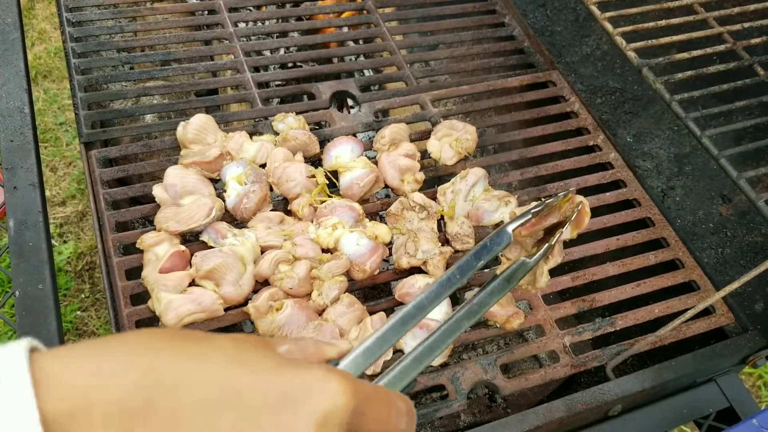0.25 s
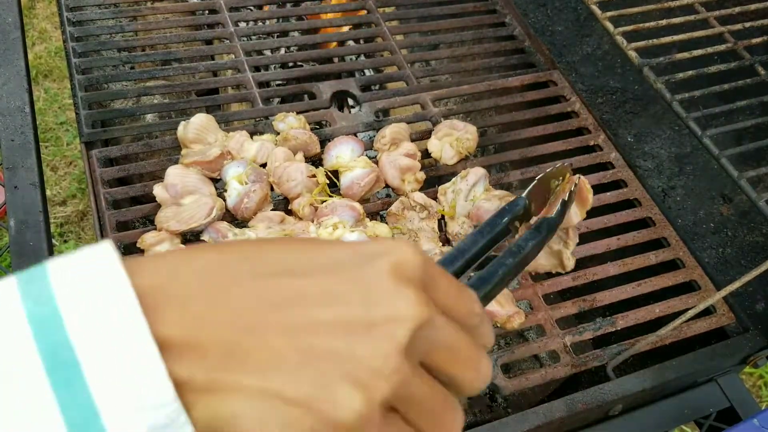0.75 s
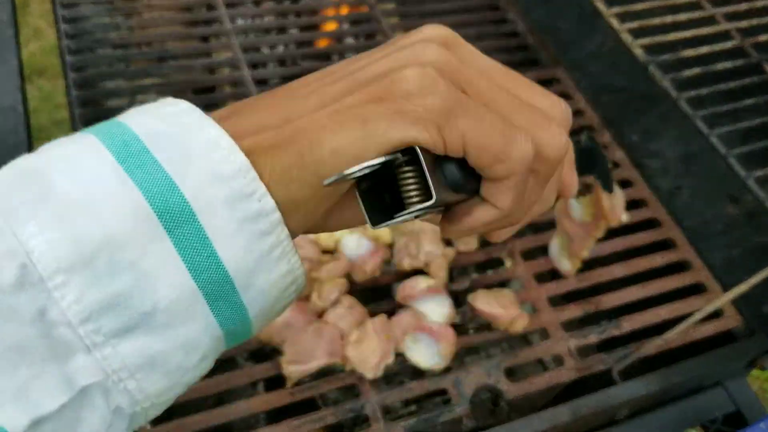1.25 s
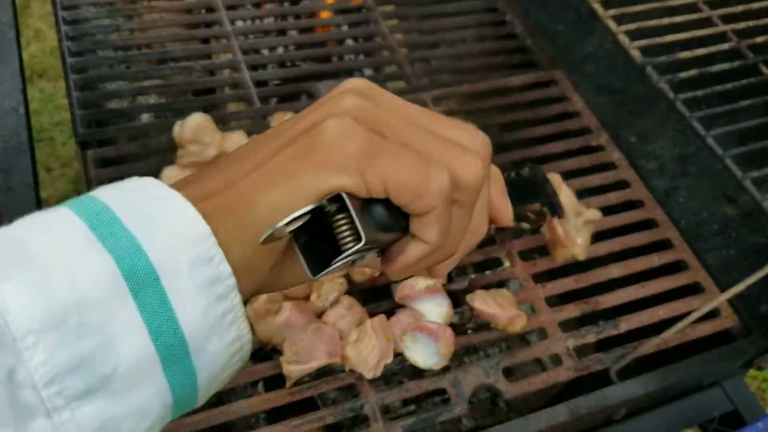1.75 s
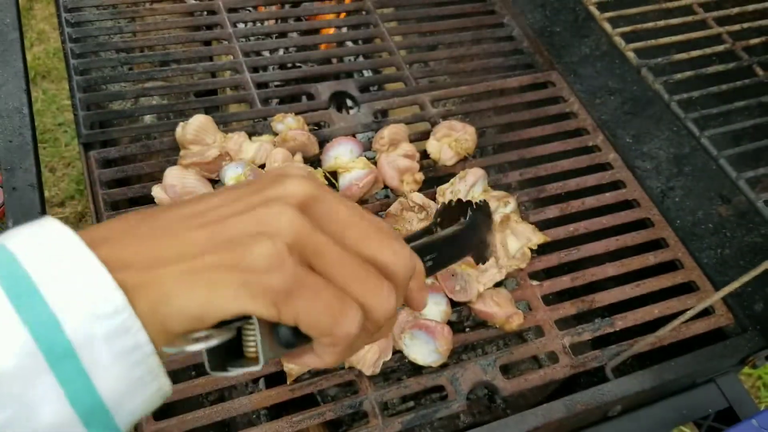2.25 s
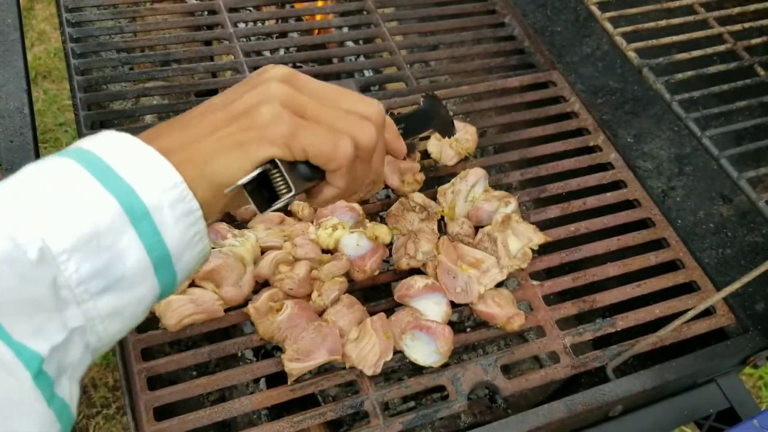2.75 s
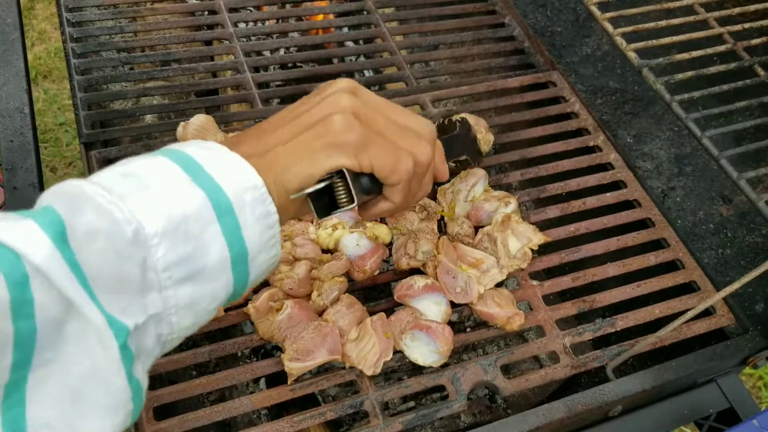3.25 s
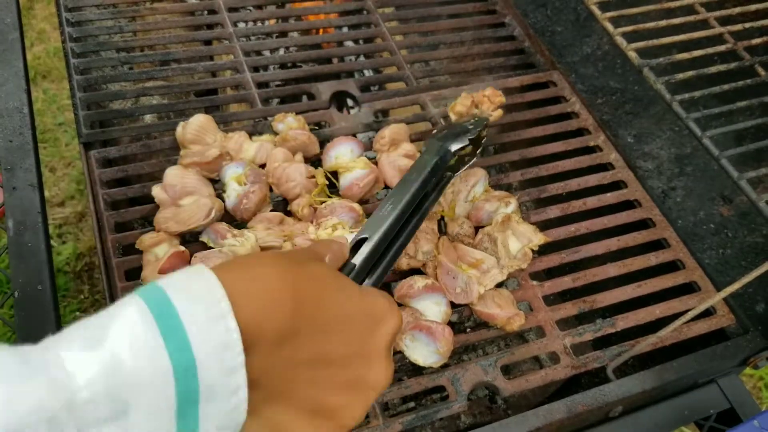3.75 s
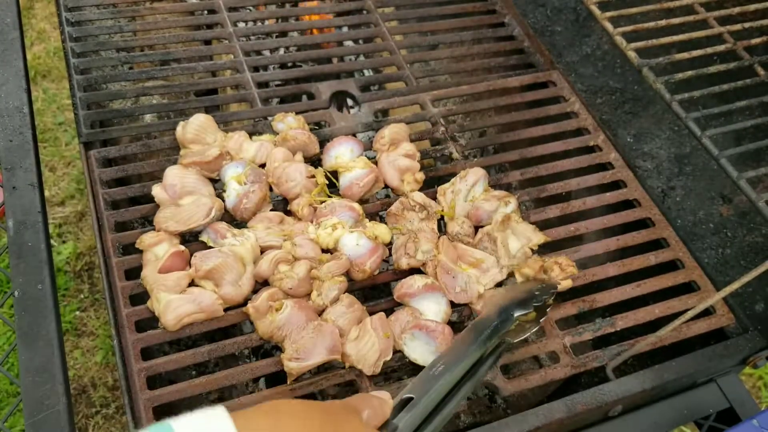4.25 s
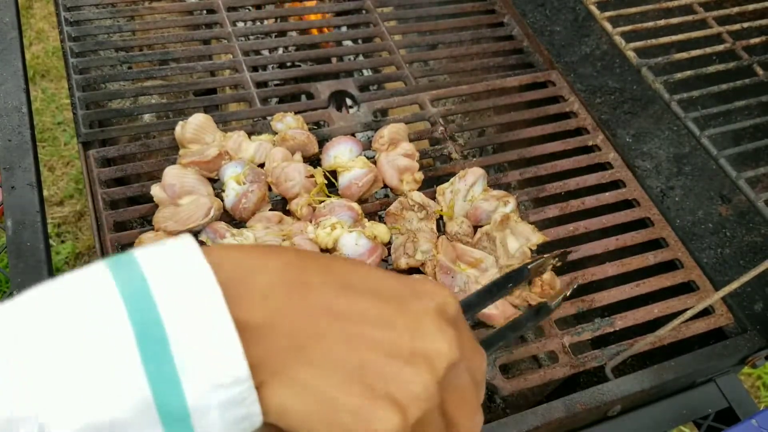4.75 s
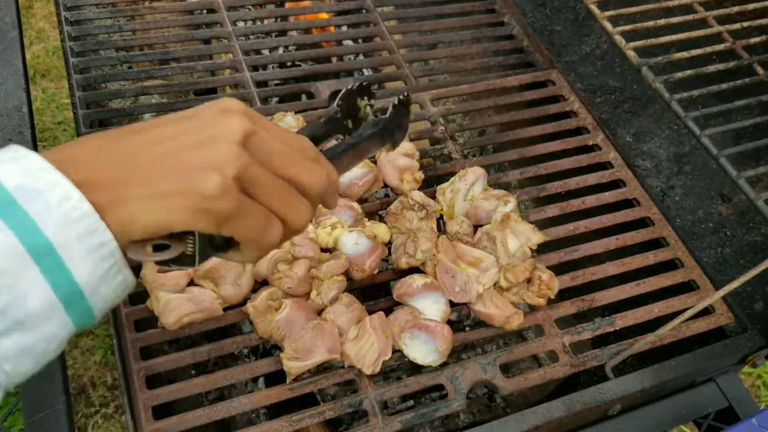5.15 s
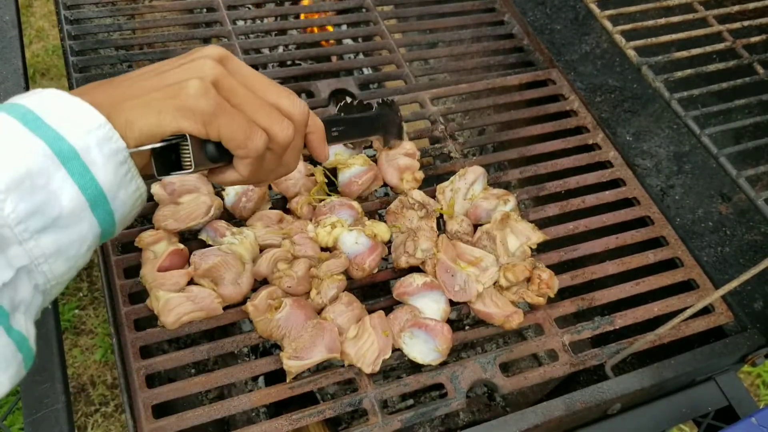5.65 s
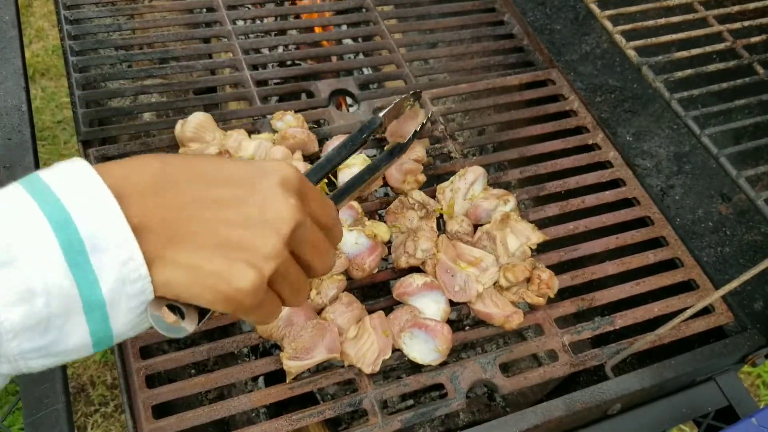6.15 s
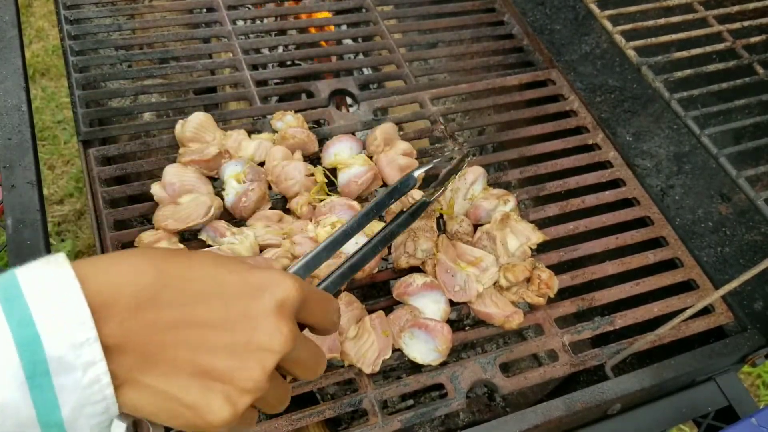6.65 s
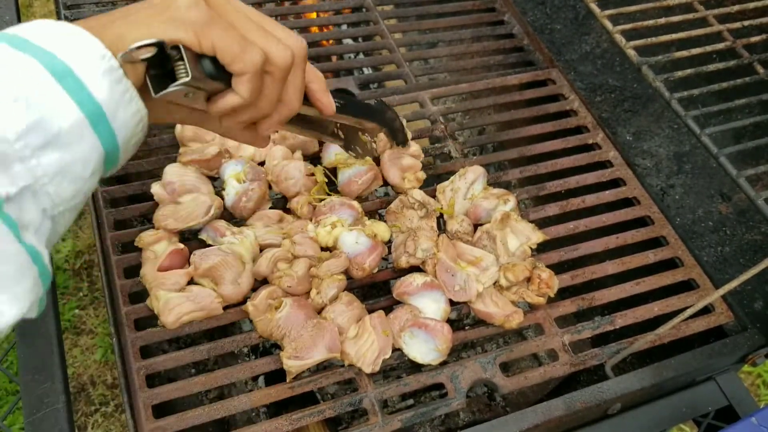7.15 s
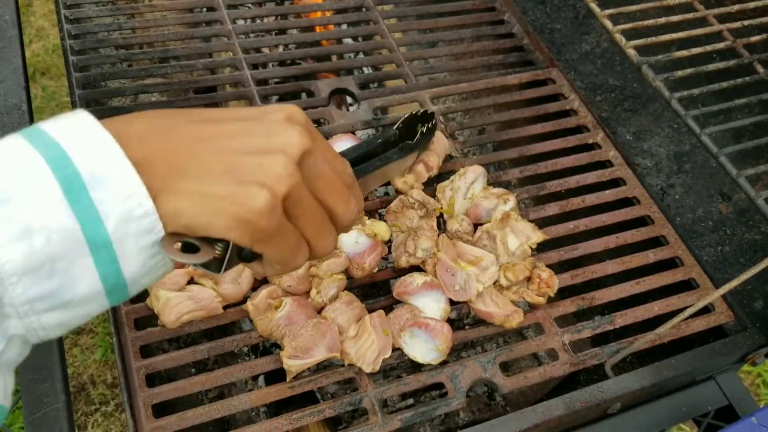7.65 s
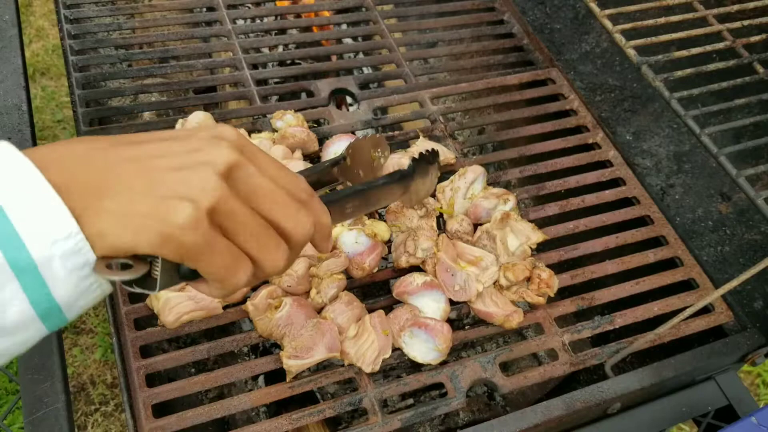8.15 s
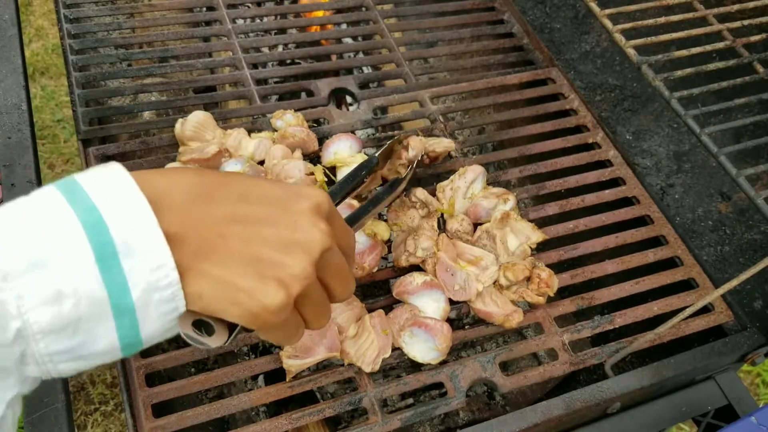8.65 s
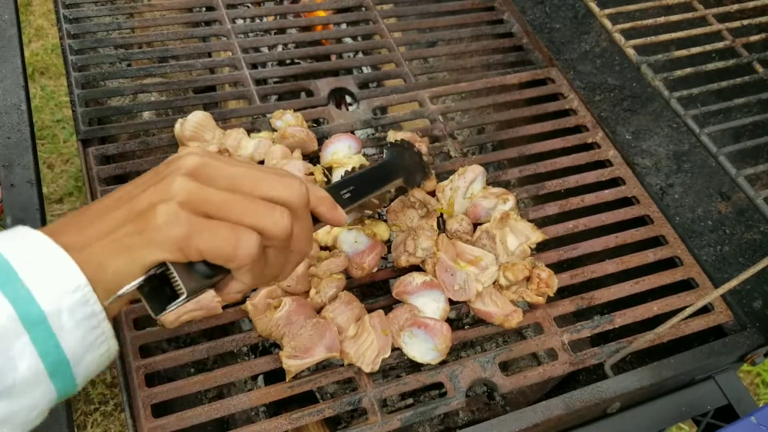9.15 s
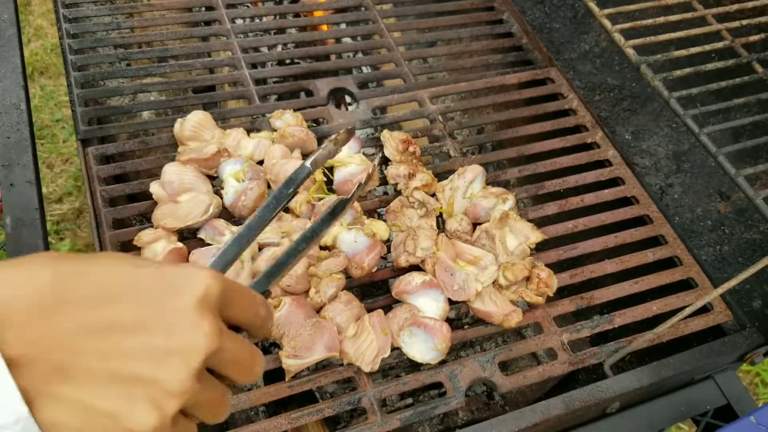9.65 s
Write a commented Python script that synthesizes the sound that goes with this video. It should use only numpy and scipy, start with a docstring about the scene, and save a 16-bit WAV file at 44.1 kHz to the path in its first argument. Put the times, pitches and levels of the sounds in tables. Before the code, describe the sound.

Steel tongs turn raw meat on a hot iron grill, with hissing flares, sleeve rustle, soft scrapes, a bright snap and a late metallic clank.

```python
"""Tongs on a hot grill

Close by, outdoors, steel tongs turn meat on an iron grate: they snap, knock, scrape and squeak.
Impacts combine filtered noise with decaying modes; friction is fluctuating noise or an unsteady tone.
Fat sizzles as noise and crackle, with flares of wet meat on hot iron; steam is resonant noise.
A sleeve rustles as clumped snags, and a low rumble, hum, wash and wind buffets are shaped noise.
"""
import sys
import numpy as np
from scipy import signal
from scipy.fft import rfft, irfft, next_fast_len
from scipy.io import wavfile

SR = 44100
rng = np.random.default_rng(int(sys.argv[2]) if len(sys.argv) > 2 else 0)


def wav_record(signal):
    """Record a signal, one row per channel, as 16-bit PCM in the file named by sys.argv[1]."""
    frames = np.transpose(np.atleast_2d(signal))
    bounded = np.clip(frames, -1, 1)
    # unit amplitude maps onto the largest positive 16-bit level
    quanta = np.round(bounded * 32767).astype(np.int16)
    wavfile.write(sys.argv[1], SR, quanta)


N = 437472

# Likeness of the two microphone ports: (frequency [Hz], correlation [-1 to 1])
PORT_CORRELATION = [(60, 0.99), (130, 0.96), (290, 0.88), (640, 0.095), (1400, 0.081), (15000, 0)]
# Balance of the ports: (frequency [Hz], left minus right [dB])
PORT_BALANCE = [(60, -1), (92, 2), (140, -1), (210, 1.5), (330, 0), (500, 2.5), (770, 0.5), (1170, 3),
                (1790, 1), (2740, 1), (4190, 3.5), (6410, 2.5), (9810, -4), (15000, 1.5)]

# Outdoor rumble and wash: (frequency [Hz], relative level [dB])
AIR_SPECTRUM = [(12, -70), (20, -13), (30, -22.5), (48, 1.5), (99, -0.5), (117, -6.5), (134, -5.5),
                (167, -10), (311, -22.5), (351, -26.5), (429, -28), (615, -33), (830, -31), (1710, -42.5),
                (2400, -53.5), (3120, -55), (5280, -120)]
# Rumble course, before its offset in outdoors(): (time [s], level [dB])
RUMBLE_LEVEL = [(0.0, -54.5), (2.98, -55.5), (3.23, -54.5), (8.09, -58.5), (8.79, -53), (9.92, -57.5)]
# Course of the faint mid-range wash, with some sleeve rustle near 1 s, before its offset in
# outdoors(): (time [s], level [dB])
WASH_LEVEL = [(0.0, -74.5), (0.6, -77.5), (0.83, -72.5), (1.13, -73), (1.57, -77.5), (2.3, -74), (2.6, -75),
              (3.06, -67.5), (3.59, -71.5), (4.35, -73.5), (4.6, -72), (6.1, -73.5), (8.3, -73.5),
              (9.4, -70.5), (9.92, -67)]
# Wind on the microphone: (time [s], length [s], level [dB])
WIND_BUFFETS = [(2.508, 0.19, -67), (4.349, 0.73, -60), (5.087, 0.35, -57), (9.103, 0.3, -56)]

# Steady sizzle: (frequency [Hz], relative level [dB])
FAT_SPECTRUM = [(1060, -59), (1800, -19.5), (2410, -14.5), (2760, -14), (3590, -12), (3860, -6), (5560, 2),
                (7850, -2.5), (8520, -2), (9240, -6.5), (12900, 1.5), (15100, -0.5), (15800, -3.5)]
# Spray from a wet side: (frequency [Hz], relative level [dB])
WET_SPECTRUM = [(1000, -10), (2200, -10), (2800, -1), (3500, -6), (5000, -3.5), (8000, 1.5), (9500, -4),
                (12500, 5), (15600, 5)]
# Flares of wet meat on hot iron; the first is already sizzling at the start:
# (time [s], level [dB], rise [s], hold [s],
# fade [dB/s], lower edge of the hiss [Hz], brightness [dB/octave])
SEAR_FLARES = [(0, -54.5, 0.0091, 0.95, 11, 3980, -2.5), (1.947, -53, 0.057, 0.39, 54, 2600, 0.5),
               (3.017, -48, 0.027, 0.33, 9, 4200, -2.5), (3.139, -50.5, 0.031, .05, 34, 2880, -3.5),
               (5.582, -52.5, 0.033, 0.2, 113, 3150, -1.5), (6.609, -43.5, 0.0044, 0.01, 112, 2920, -0.5),
               (6.665, -42.5, .015, 0.033, 28, 2560, 0.5), (7.01, -50, 0.013, 0.35, 14, 2660, -.5),
               (7.13, -55, .01, .04, 50, 2600, -3), (7.346, -48.5, 0.019, 0.071, 73, 2700, 0)]
# Steam squeezed from under a pressed piece:
# (time [s], length [s], level before the swell [dB], hiss pitch [Hz], glide [octaves])
STEAM_PUFFS = [(3.061, 0.29, -59, 8300, -0.17), (3.145, 0.22, -55, 5280, -0.33),
               (3.332, 0.11, -52.5, 4770, -.05), (3.398, 0.11, -54, 7350, .2)]

# Strokes of the sleeve along the arm:
# (time [s], level [dB], rise [s], hold [s], fade [dB/s], brightness [dB/octave])
SLEEVE_STROKES = [(0.619, -54, 0.049, 0.079, 53, -0.6), (0.939, -53.5, 0.045, 0.085, 29, -1.5),
                  (1.111, -47, 0.072, 0.13, 117, 2)]
# Rustling cloth: (frequency [Hz], relative level [dB])
CLOTH_SPECTRUM = [(100, -37), (300, -27), (800, 4.5), (1080, -5.5), (1380, 6.5), (1900, -6.5), (2170, 1.5),
                  (3300, 0), (4000, 1.5), (7500, 6.5), (12000, 7.5), (15500, 0)]

# Stick-slip of a bar or tong tip: (time [s], length [s], level [dB], pitch [Hz], glide [octaves],
# rms unsteadiness [share of the pitch])
SQUEAK_EVENTS = [(2.976, .022, -58.5, 4230, -0.043, 0.027), (3.007, .014, -61, 3950, 0, .022),
                 (4.61, .012, -56.5, 8600, 0.055, .022), (7.132, .15, -63.5, 589, -0.02, .006),
                 (8.577, 0.027, -63, 4180, -0.052, 0.023)]
# Short rubs, scrapes and dull ticks of sleeve, tongs, meat and bars: (time [s], length [s],
# level before the swell [dB], centre [Hz], spread [octaves], share of ringing power [0 to 1])
RUB_EVENTS = [(.987, 0.089, -62.5, 1000, 0.66, 0), (1.056, 0.14, -65, 700, .8, 0.4),
              (1.094, 0.014, -55, 1050, .8, 0), (1.3154, 0.0078, -50, 2140, .5, 0.04),
              (2.977, 0.14, -59.5, 750, .99, .4), (7.165, 0.22, -65, 950, 1.34, .44),
              (7.487, .025, -61, 1050, .3, 0.2), (8.522, .28, -62.5, 546, 0.96, 0.06),
              (8.961, 0.016, -60, 1700, 0.91, 0.2), (8.99, 0.013, -61, 1700, .8, 0),
              (9.132, .2, -54.5, 920, 0.98, .6), (9.297, 0.43, -61.5, 437, 0.27, .2),
              (9.827, 0.072, -58, 1340, 0.71, 0.7)]

# Modes of the grate: (frequency [Hz], level [dB], 60 dB decay time [s])
GRATE_MODES = [(287, -4, .13), (400, -7, .3), (591, 2, .21), (626, -6, .22), (675, -8, .26),
               (1026, -10, .16), (1150, -6, .18), (1190, 0, .27), (1342, -10, .14), (1420, -10, .15),
               (1965, -13, .09)]
# Modes of the fire box under the grate: (frequency [Hz], level [dB], 60 dB decay time [s])
BOX_MODES = [(283, 1, .22), (328, -1, .17), (595, -1, .14), (645, -2, .11), (832, -6, .16), (1170, -2, .15),
             (1310, -8, .22), (1558, -4, .2), (1935, -7, .12)]
# Hard blows on the grate: (time [s], level [dB], centre of the blow [Hz], spread [octaves],
# thud relative to the ringing [dB])
GRATE_KNOCKS = [(9.1215, -42.5, 640, 1.0, -7), (9.141, -47.5, 1100, .7, -4), (9.177, -55, 1190, .3, -6)]
# Low bumps: one of handling, the others of meat and tongs booming in the box: (time [s],
# level [dB], centre of the blow [Hz], spread [octaves], thud relative to the ringing [dB])
LOW_BUMPS = [(1.319, -50, 214, 0.52, 12), (2.984, -61, 750, .8, -2), (3.007, -61, 1100, 1.1, -11),
             (5.59, -56.5, 550, 2.1, -8), (5.62, -53.5, 405, 1.3, 8), (8.602, -56.5, 516, 1.5, -8),
             (9.226, -47.5, 151, 0.43, 10.5), (9.823, -47, 636, 1, -7), (9.835, -44.5, 246, 0.52, -5)]

# Modes of the tong arms: (frequency [Hz], level [dB], 60 dB decay time [s])
TONG_MODES = [(1120, -11, .055), (2606, -1, .045), (3120, 2, .055), (3225, 2, .045), (3465, 0, .06),
              (3612, -1, .04), (3980, 1, .04), (4228, 2, .05), (4604, -1, .045), (5087, -3, .04),
              (6110, 3, .04), (7111, 5, .033), (7392, 6, .033), (8070, 5, .03), (10570, 1, .033),
              (12110, 7, .028), (12960, 3, .026), (14865, 4, .03), (15400, 4, .028)]
# High modes of a struck bar with the tongs on it:
# (frequency [Hz], level [dB], 60 dB decay time [s])
BAR_MODES = [(2490, 0, .09), (2800, -4, .08), (2934, -2, .1), (3370, -2, .08), (3560, -5, .07),
             (4129, 3, .07), (7200, 2, .04), (7817, -3, .07)]
# Crack of steel on steel, also used for light touches: (frequency [Hz], relative level [dB])
STEEL_CRACK = [(200, -38), (600, -49), (1100, -18), (1500, -17), (2000, -17), (2600, -11.5), (3300, -9.5),
               (4200, -1), (5200, 7.5), (6200, 5.5), (7400, 13), (9500, 3.5), (12200, 10), (13800, 13.5),
               (15200, 8)]
# Crack of steel on iron: (frequency [Hz], relative level [dB])
IRON_CRACK = [(200, -38), (1100, -6), (1600, -11), (1900, -12), (2700, -14.5), (3400, -7), (4200, 4.5),
              (5000, -5), (5900, 1), (6800, 3.5), (8300, 4), (9500, -7.5), (13000, -2), (15200, 5)]
# Tong tips clap together and chatter: (time [s], level [dB], sliding time [s],
# brightness [dB/octave], after-ring [dB])
TIP_CLICKS = [(6.547, -20.5, 0.00057, 0.5, -9.5), (6.5522, -36, .0006, -7, -8), (6.558, -30, .0014, 2, -18),
              (6.5596, -31, .0012, -0.5, -8), (6.5612, -25.5, .0013, -1.5, -13),
              (6.5657, -34.5, .0007, -10, -5), (6.5678, -41, .001, 4, -12)]
# Tongs strike an iron bar and bounce: (time [s], level [dB], sliding time [s],
# brightness [dB/octave], after-ring [dB])
BAR_CLANKS = [(9.1203, -24.5, 0.00032, -3, -32), (9.1214, -25.5, 0.0005, 1.5, -18),
              (9.1415, -34.5, 0.0019, -2.5, -4)]
# Light touches of the tongs and spits of fat: (time [s], level [dB], sliding time [s],
# brightness [dB/octave], after-ring [dB])
LIGHT_TICKS = [(.1357, -34.5, 0.0026, 0, -30), (.433, -43, 0.0029, -0.5, -20),
               (.9424, -42.5, 0.0038, -3, -11), (2.983, -45, 0.031, -10, -2),
               (3.0491, -41.5, 0.0023, 7, -17), (6.0782, -43, 0.0023, 4, -20),
               (7.497, -44.5, 0.011, -5.5, -2), (8.2755, -46.5, .004, -2, -13), (8.588, -48, 0.0033, -8, 0),
               (8.9625, -43.5, 0.0022, -4, -18), (8.9922, -49, .002, -9, -10),
               (9.8211, -47.5, .004, -1, -3)]


def amp(db):
    """Logarithmic level: decibels become an amplitude gain."""
    return 10 ** (np.asarray(db) / 20)


def unit(x):
    """Power normalization: scales a signal to an rms of 1."""
    return x / np.sqrt(np.mean(x ** 2) + 1e-30)


def read(points, hz):
    """Linear interpolation of a spectrum on a log-frequency axis."""
    f, value = np.transpose(points)
    return np.interp(np.log(hz + 1), np.log(f + 1), value)


def curve(rows):
    """Linear interpolation of a timed level at every sample."""
    times, levels = np.transpose(rows)
    return np.interp(np.arange(N) / SR, times, levels)


def add(mix, s, sound):
    """Superposition: adds a stereo sound at time s, cut off at the end of the mix."""
    part = mix[:, round(s * SR):][:, :sound.shape[1]]
    part += sound[:, :part.shape[1]]


def colour(x, db_at):
    """Linear filtering: multiplies the spectrum by a gain in dB given as a function of Hz."""
    size = next_fast_len(x.shape[1] + 512)
    gain = amp(db_at(np.fft.rfftfreq(size, 1 / SR)))
    return irfft(rfft(x, size) * gain, size)[:, :x.shape[1]]


def octaves(hz, centre_hz):
    """Logarithmic pitch: signed distance from a centre in octaves."""
    return np.log2((hz + 1) / centre_hz)


def ports(x):
    """Spatial coherence: two unrelated signals come to share their bass but not their treble."""
    size = next_fast_len(x.shape[1])
    hz = np.fft.rfftfreq(size, 1 / SR)
    a, b = rfft(x, size)
    same = np.clip(read(PORT_CORRELATION, hz), -1, 1)
    side = amp(read(PORT_BALANCE, hz) / 2)
    left = a * side
    right = (same * a + np.sqrt(1 - same ** 2) * b) / side
    return irfft([left, right], size)[:, :x.shape[1]]


def noise(size):
    """Random excitation: white noise given the coherence and balance of the ports."""
    return ports(rng.standard_normal((2, size)))


def flutter(size, rate_hz, depth_db):
    """Random amplitude modulation: low-passed noise sets a gain with an rms depth in dB."""
    slow = colour(rng.standard_normal((1, size)), lambda hz: -20 * np.log10(1 + (hz / rate_hz) ** 4))
    return amp(depth_db * unit(slow))


def crackle(size, per_s, spread_db):
    """Random impulse train: pulses of uneven size and sign, each with its own inter-port delay."""
    sizes = amp(spread_db * np.minimum(rng.exponential(1, size), 6))
    signs = rng.choice([-1, 1], size)
    pops = sizes * signs * (rng.random(size) < per_s / SR)
    arrival = (np.arange(size) + rng.integers(-15, 16, size)) % size
    late = np.bincount(arrival, pops, size)
    return unit(ports(np.array([pops, late])))


def swell(size, rise, hold, fade_db_per_s):
    """Exponential decay: a gain rises linearly, holds, then falls at a constant rate in dB."""
    t = np.arange(size) / SR
    return np.clip(t / rise, 0, 1) * amp(-fade_db_per_s * np.maximum(t - rise - hold, 0))


def ring(modes, t, apart_hz):
    """Modal superposition: damped sines whose phases may differ more between ports when higher."""
    out = 0
    for hz, db, t60 in modes:
        apart = min(hz / apart_hz, .5) * rng.uniform(-1, 1, (2, 1))  # in cycles
        wave = np.sin(2 * np.pi * (hz * t + rng.random() + apart))
        out = out + amp(db - 60 * t / t60) * wave
    return out


def outdoors(rumble_db=1, wash_db=5, hum_db=-60, hum_hz=107):
    """Band separation: gusty low noise and a faint mid-range wash, with a narrow-band noise hum."""
    air = colour(noise(N), lambda hz: read(AIR_SPECTRUM, hz))
    low = colour(air, lambda hz: -20 * np.log10(1 + (hz / 420) ** 4))
    hum = unit(colour(noise(N), lambda hz: -20 * np.log10(1 + ((hz - hum_hz) / 6) ** 2)))
    wash = unit(air - low) * flutter(N, rate_hz=12.0, depth_db=1.5)
    rumble = unit(low) * flutter(N, rate_hz=6.4, depth_db=1.5)  # small random gusts
    rumble = rumble * amp(curve(RUMBLE_LEVEL) + rumble_db)
    wash = wash * amp(curve(WASH_LEVEL) + wash_db)
    return rumble + wash + hum * amp(hum_db)


def buffets(centre_hz=58, width_hz=24):
    """Wind pressure fluctuation: puffs of low narrow-band noise thrum on the microphone."""
    out = np.zeros((2, N))
    for s, length, db in WIND_BUFFETS:
        puff = colour(noise(round(length * SR)),
                      lambda hz: -20 * np.log10(1 + ((hz - centre_hz) / width_hz) ** 4))
        add(out, s, amp(db) * unit(puff * np.hanning(puff.shape[1])))
    return out


def sizzle(start_db=-52, drying_db_per_s=0.26):
    """Statistical bubble noise: bursts of fat merge into a hiss that dies down as pieces dry."""
    bursts = noise(N) + 0.4 * crackle(N, per_s=2500, spread_db=0.5)
    fat = unit(colour(bursts, lambda hz: read(FAT_SPECTRUM, hz)))
    fat = fat * flutter(N, rate_hz=53, depth_db=.5)
    return fat * amp(start_db - drying_db_per_s * np.arange(N) / SR)


def sears():
    """Boiling on hot iron: wet meat throws a fine spray; larger bubbles lower the edge of its hiss."""
    out, size = np.zeros((2, N)), 3 * SR
    for s, db, rise, hold, fade, edge_hz, tilt_db in SEAR_FLARES:
        def spectrum(hz):
            low_cut = -10 * np.log10(1 + (edge_hz / (hz + 1)) ** 8)
            return read(WET_SPECTRUM, hz) + tilt_db * octaves(hz, 8000) + low_cut

        bursts = noise(size) + 0.29 * crackle(size, per_s=3500, spread_db=3)
        spray = unit(colour(bursts, spectrum)) * flutter(size, rate_hz=13, depth_db=1.96)
        add(out, s, amp(db) * spray * swell(size, rise, hold, fade))
    return out


def steam(width_hz=1400):
    """Jet resonance: a sputtering hiss glides in pitch as the gap under the meat changes."""
    out, r = np.zeros((2, N)), np.exp(-np.pi * width_hz / SR)
    for s, length, db, hz, glide in STEAM_PUFFS:
        u = np.linspace(0, 1, round(length * SR))
        jet_hz = hz * 2 ** (glide * (u - .5)) * flutter(len(u), rate_hz=35, depth_db=.25)
        turn = np.exp(2j * np.pi * np.cumsum(jet_hz) / SR)
        # shift the moving band to zero frequency, low-pass it, and shift it back
        band = signal.lfilter([1], [1, -2 * r, r * r], noise(len(u)) / turn)
        jet = unit((turn * band).real)
        sputter = unit(flutter(len(u), rate_hz=70, depth_db=2.6))
        add(out, s, amp(db) * jet * np.sin(np.pi * u ** 0.69) * sputter)
    return out


def sleeve():
    """Fibre friction: cloth catches and lets go in uneven clumps, with a brightness per stroke."""
    out = np.zeros((2, N))
    for s, db, rise, hold, fade, tilt_db in SLEEVE_STROKES:
        snags = crackle(SR, per_s=260, spread_db=2)
        snags = colour(snags, lambda hz: -10 * np.log10(1 + (hz / 4000) ** 2))
        fibres = noise(SR) * flutter(SR, rate_hz=82, depth_db=1.2) + 1.1 * snags
        rustle = unit(colour(fibres, lambda hz: read(CLOTH_SPECTRUM, hz)
                             + tilt_db * octaves(np.maximum(hz, 600), 4000)))
        clumps = flutter(SR, rate_hz=28, depth_db=1.3)
        add(out, s, amp(db) * rustle * clumps * swell(SR, rise, hold, fade))
    return out


def squeaks(overtone_db=-17):
    """Stick-slip oscillation: a short tone of unsteady pitch and grip, with a weak octave."""
    out = np.zeros((2, N))
    for s, length, db, hz, glide, unsteady in SQUEAK_EVENTS:
        u = np.linspace(0, 1, round(length * SR))
        waver = 1 + unsteady * unit(flutter(len(u), rate_hz=160, depth_db=.1) - 1)
        phase = 2 * np.pi * np.cumsum(hz * 2 ** (glide * (u - .5)) * waver) / SR
        grip = np.sin(np.pi * u) * flutter(len(u), rate_hz=100, depth_db=3.5)
        tone = np.sin(phase) + amp(overtone_db) * np.sin(2 * phase)
        add(out, s, amp(db) * unit(tone * grip))
    return out


def rubs(judder_db=1.0):
    """Friction-driven resonance: uneven rub noise is mixed dry and through the grate's modes."""
    out, t = np.zeros((2, N)), np.arange(SR // 3) / SR
    for s, length, db, centre_hz, spread, ringing in RUB_EVENTS:
        def press(hz):
            band = -6 * np.log2(1 + (octaves(hz, centre_hz) / spread) ** 2)
            return band - 20 * np.log10(1 + (hz / 2400) ** 4)

        u = np.linspace(0, 1, round(length * SR))
        rub = noise(len(u)) * flutter(len(u), rate_hz=33, depth_db=judder_db)
        response = ring(GRATE_MODES, t, apart_hz=4940)
        bars = signal.fftconvolve(rub, response, axes=1)[:, :len(u)]
        share = np.clip(ringing, 0, 1)
        ringing_rub = np.sqrt(share) * unit(colour(bars, press))
        dry_rub = np.sqrt(1 - share) * unit(colour(rub, press))
        add(out, s, amp(db) * (ringing_rub + dry_rub) * np.sin(np.pi * u ** 0.5))
    return out


def knocks(rows, modes, thud_t60=0.2, rise_s=0.0013, left_db=2):
    """Selective modal excitation: soft blows wake low modes, hard ones high; a dull thud is added."""
    out, t = np.zeros((2, N)), np.arange(SR // 2) / SR
    for s, db, centre_hz, spread, thud_db in rows:
        def blow(hz):
            return -9 * np.log2(1 + (octaves(hz, centre_hz) / spread) ** 2)

        struck = [(hz, level + blow(hz), t60) for hz, level, t60 in modes]
        ringing = ring(struck, t, apart_hz=5200)
        thud = colour(noise(len(t)), lambda hz: blow(hz) - 20 * np.log10(1 + (hz / 2200) ** 4))
        thud = thud * amp(-60 * t / thud_t60)
        hit = (unit(ringing) + amp(thud_db) * unit(thud)) * (1 - np.exp(-t / rise_s))
        early_rms = np.sqrt(np.mean(hit[:, t < .02] ** 2))  # the level refers to the first 20 ms
        add(out, s, amp(db) * hit / early_rms)
    return out * amp([[left_db / 2], [-left_db / 2]])


def strike(rows, spectrum, modes, crack_t60, ring_db, tail_db, tail_t60, tail_hz, lowest_hz, left_db):
    """Impact and modal decay: a snap grates while sliding, then modes and a duller tail ring on."""
    out, t = np.zeros((2, N)), np.arange(8000) / SR
    snap = 4.2 * (np.arange(len(t)) == 12)  # the first touch is one sharp pulse
    for s, db, slide, tilt_db, after_db in rows:
        def balance(hz):
            tilt = tilt_db * octaves(np.maximum(hz, 2000), 6000)
            return tilt - 10 * np.log10(1 + (lowest_hz / (hz + 1)) ** 6)

        steel = unit(colour(noise(len(t)) + snap, lambda hz: read(spectrum, hz)))
        tail = unit(colour(steel, lambda hz: -10 * np.log10(1 + (hz / tail_hz) ** 3)))
        since = np.maximum(t - slide, 0)  # time since the sliding stopped
        crack = steel * amp(-60 * since / crack_t60)
        tail = tail * amp(after_db + tail_db - 60 * since / tail_t60)
        ringing = amp(after_db + ring_db) * ring(modes, t, apart_hz=10100)
        hit = colour(crack + tail + ringing, balance)
        energy = np.sum(hit ** 2) / (.01 * SR)  # the level refers to energy spread over 10 ms
        add(out, s, amp(db) * hit / np.sqrt(energy))
    return out * amp([[left_db / 2], [-left_db / 2]])


def scene():
    """Superposition of open air, cooking, sleeve, friction and impacts."""
    background = outdoors() + buffets()
    cooking = sizzle() + sears() + steam()
    friction = sleeve() + squeaks() + rubs()
    blows = knocks(GRATE_KNOCKS, GRATE_MODES) + knocks(LOW_BUMPS, BOX_MODES)
    ticks = strike(LIGHT_TICKS, STEEL_CRACK, TONG_MODES, crack_t60=0.018, ring_db=-11, tail_db=3.5,
                   tail_t60=0.54, tail_hz=7000, lowest_hz=700, left_db=-1.0)
    clanks = strike(BAR_CLANKS, IRON_CRACK, BAR_MODES, crack_t60=.0105, ring_db=-7, tail_db=0,
                    tail_t60=.1, tail_hz=7000, lowest_hz=300, left_db=2)
    clicks = strike(TIP_CLICKS, STEEL_CRACK, TONG_MODES, crack_t60=.009, ring_db=-8.5, tail_db=-4,
                    tail_t60=.05, tail_hz=5000, lowest_hz=900, left_db=.7)
    return background + cooking + friction + blows + ticks + clanks + clicks


def record(dry, edge_hz=15950):
    """Band limitation: a linear-phase low-pass removes the highest treble."""
    low_pass = signal.firwin(511, edge_hz, window=("kaiser", 8), fs=SR)
    return signal.oaconvolve(dry, low_pass[None], "same")


dry = scene()
out = record(dry)
wav_record(out)
```